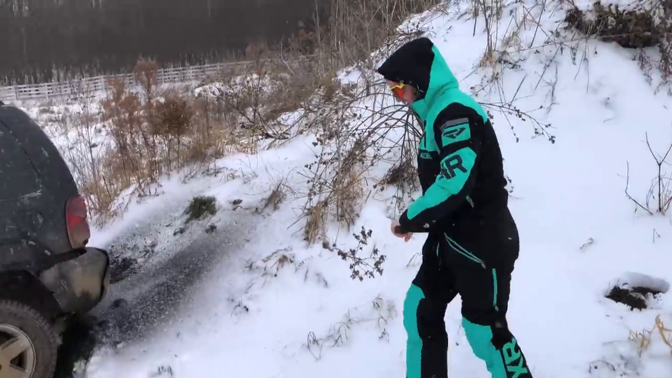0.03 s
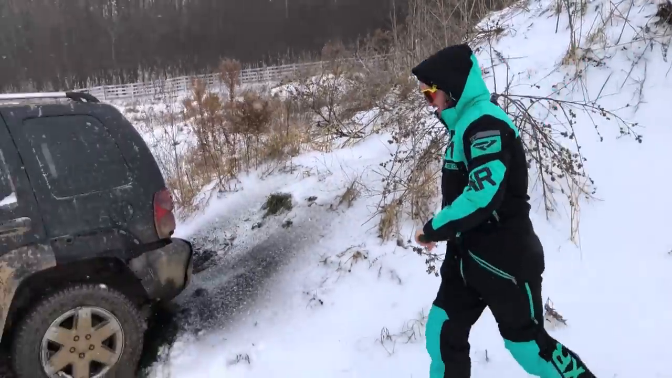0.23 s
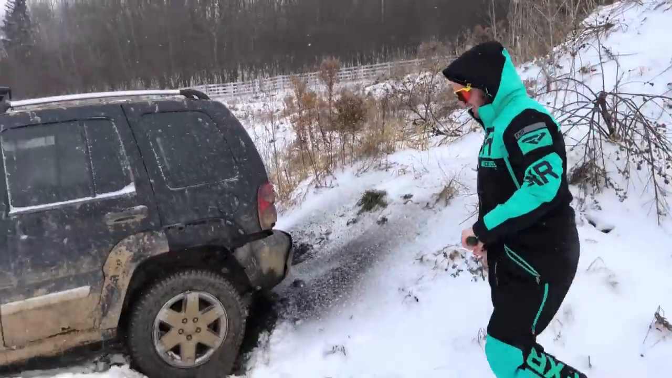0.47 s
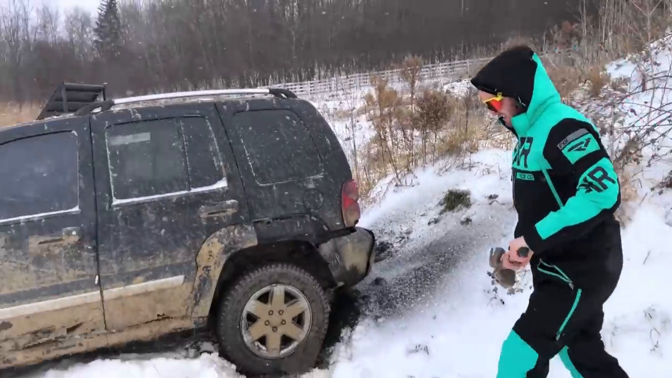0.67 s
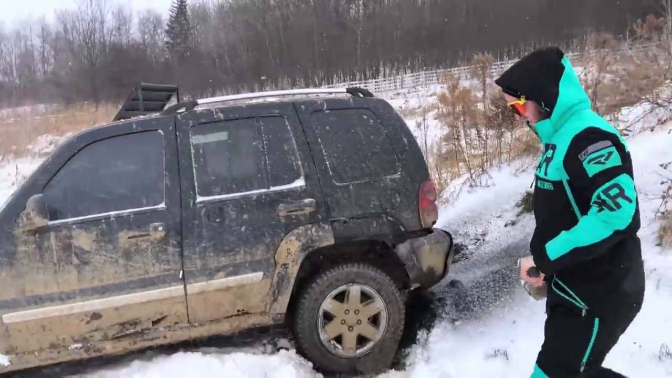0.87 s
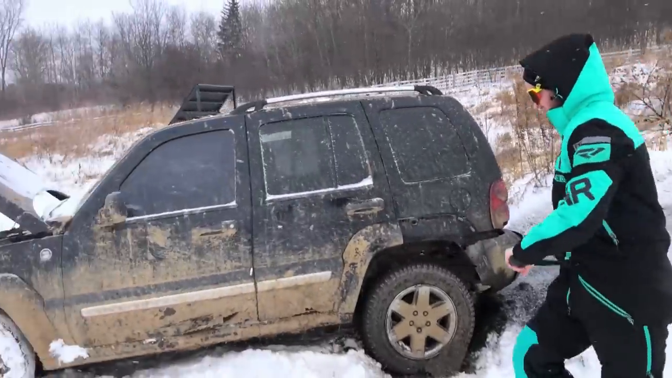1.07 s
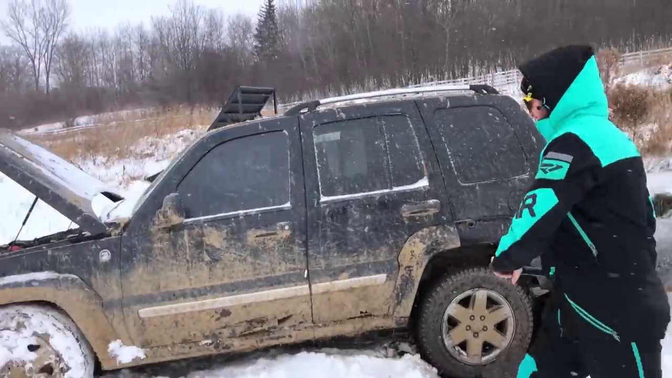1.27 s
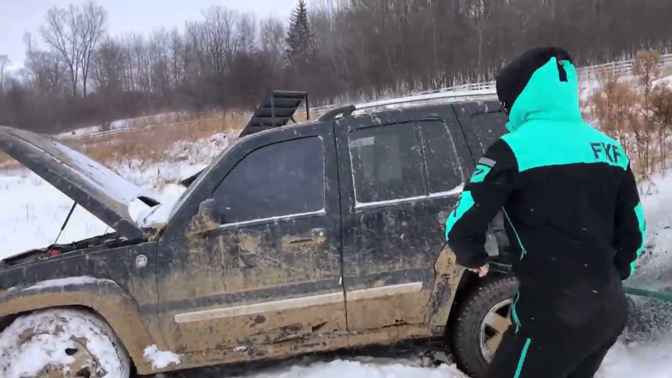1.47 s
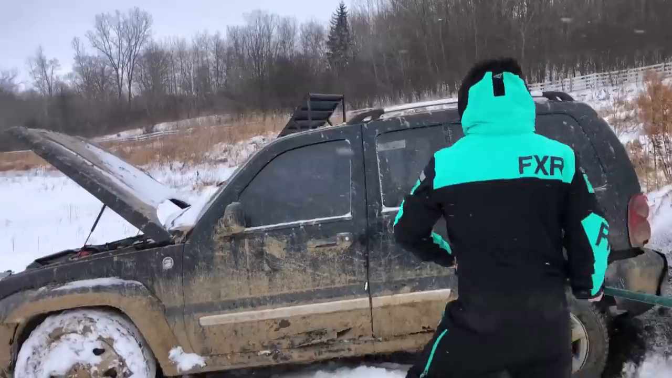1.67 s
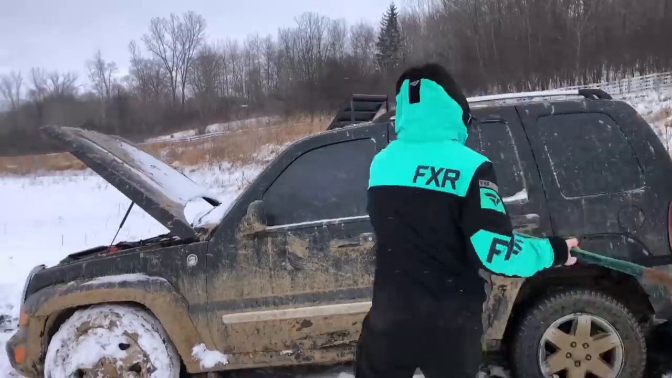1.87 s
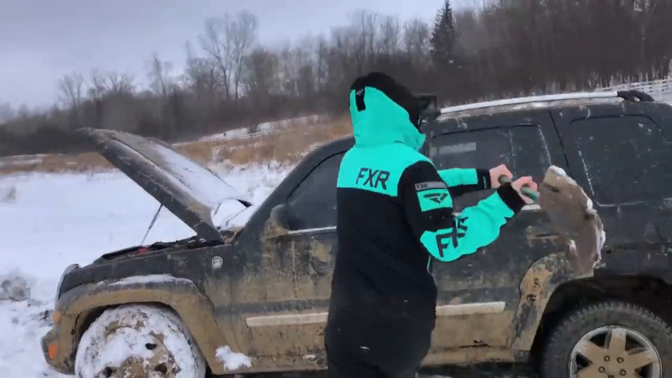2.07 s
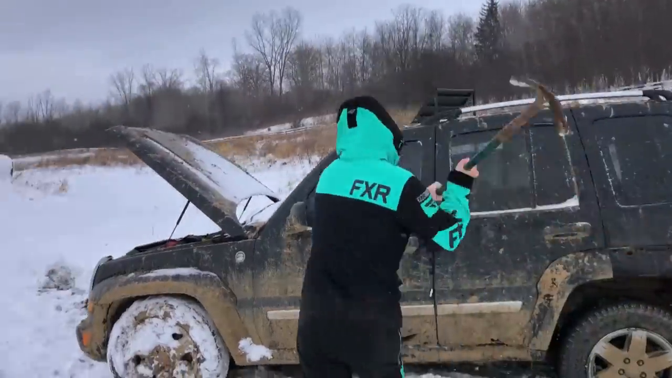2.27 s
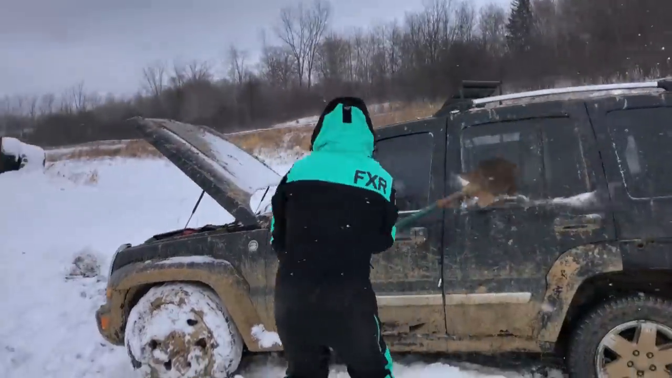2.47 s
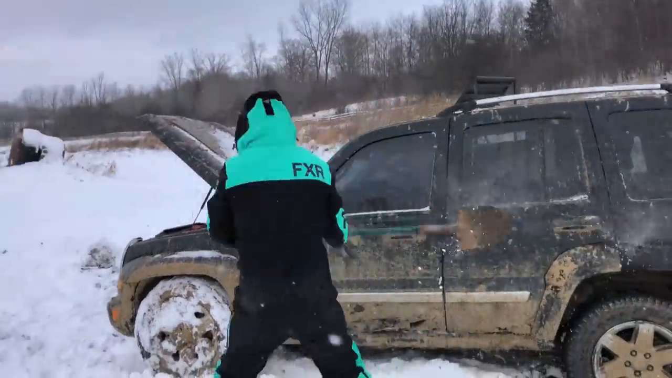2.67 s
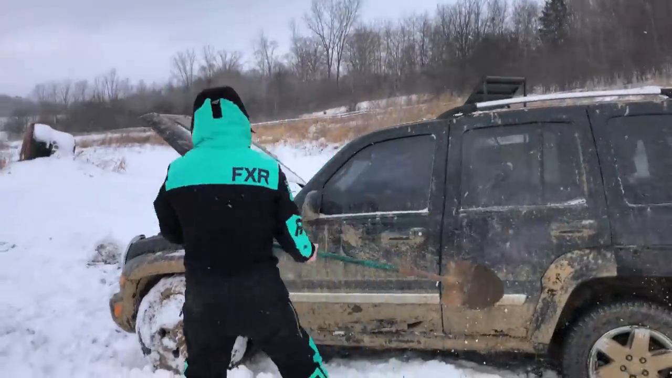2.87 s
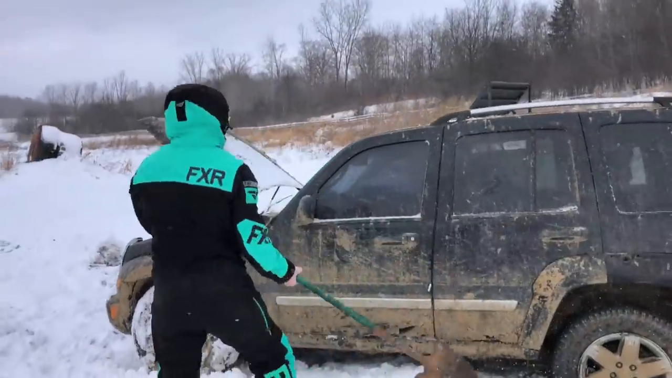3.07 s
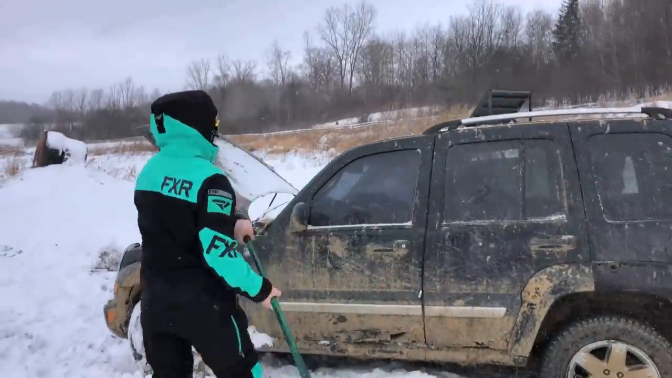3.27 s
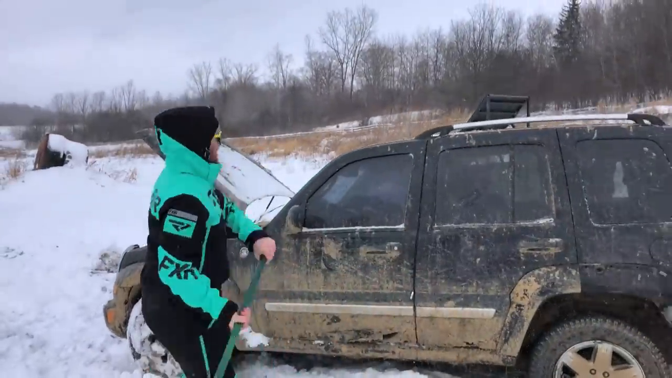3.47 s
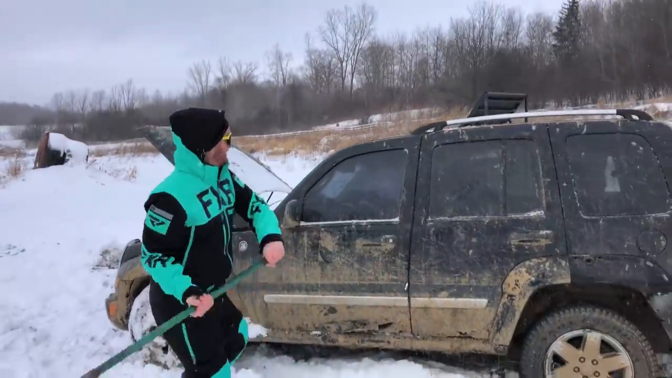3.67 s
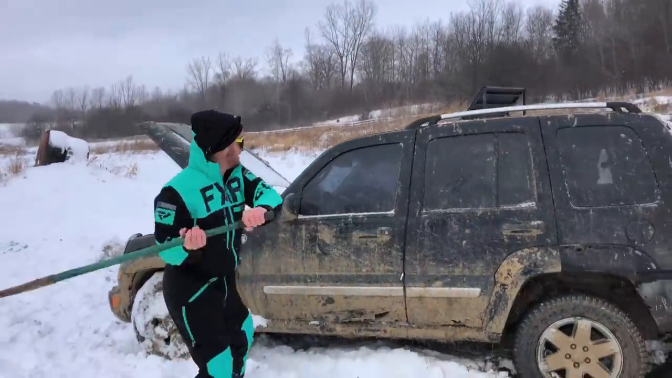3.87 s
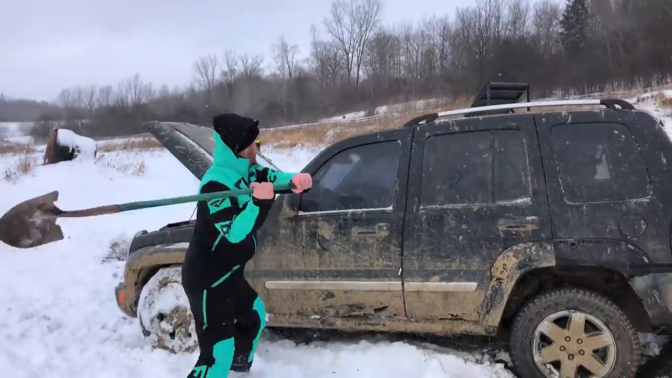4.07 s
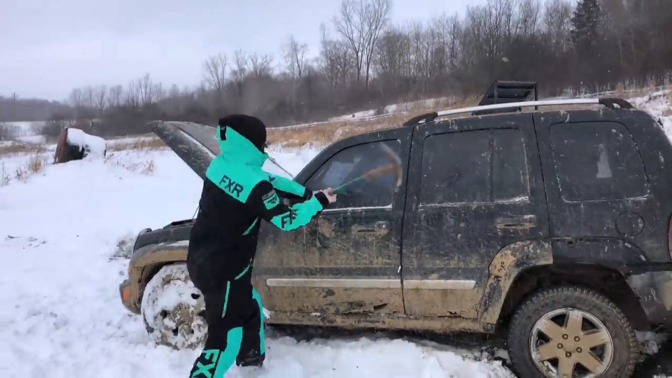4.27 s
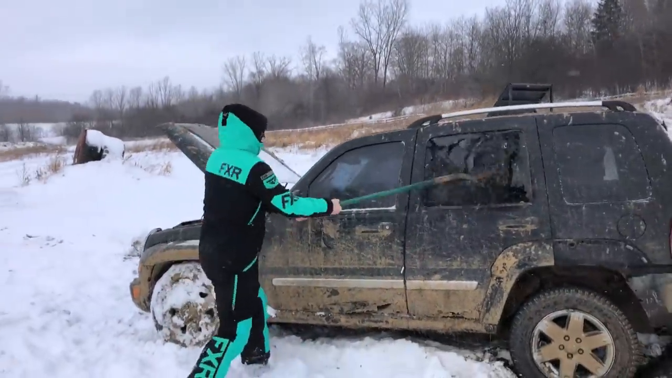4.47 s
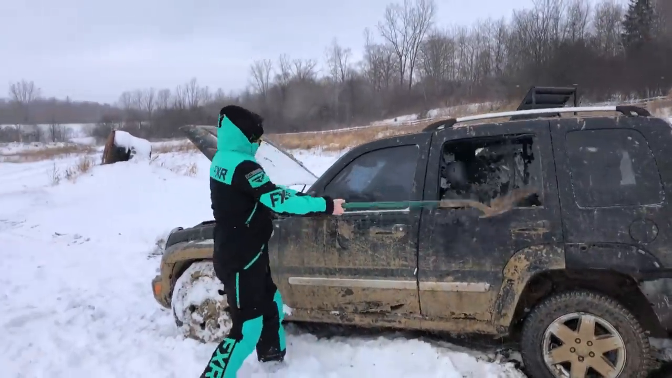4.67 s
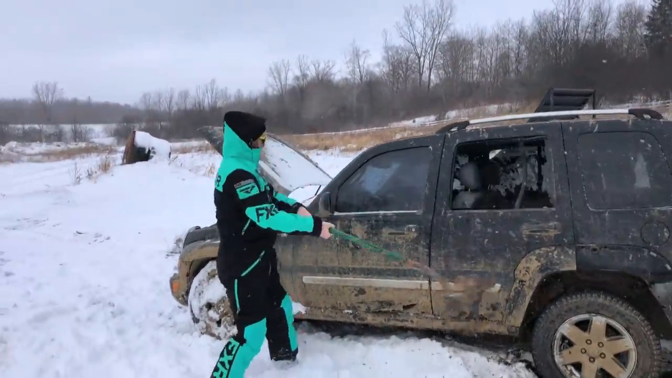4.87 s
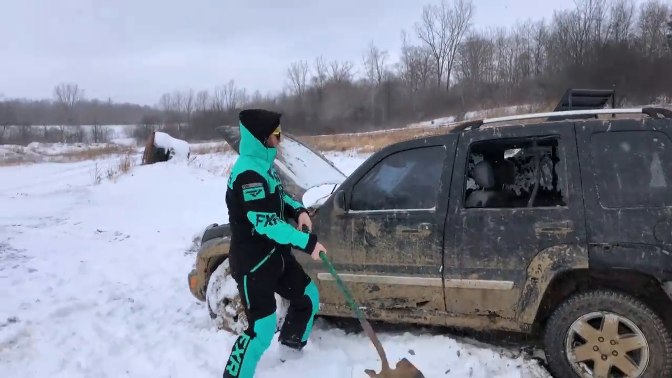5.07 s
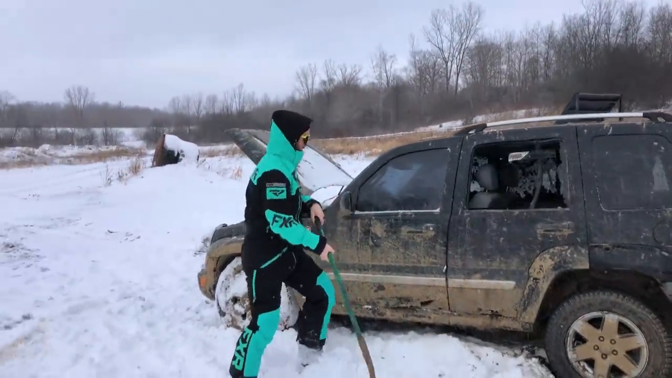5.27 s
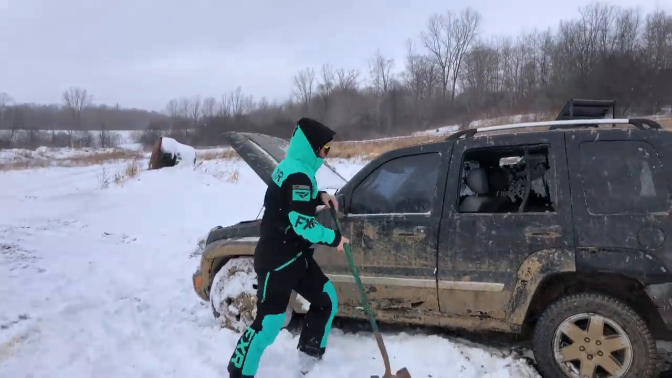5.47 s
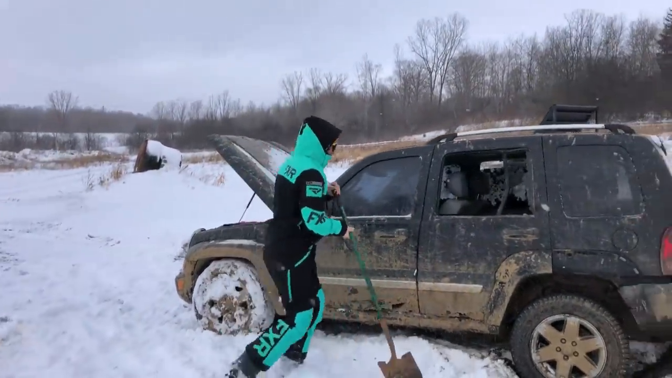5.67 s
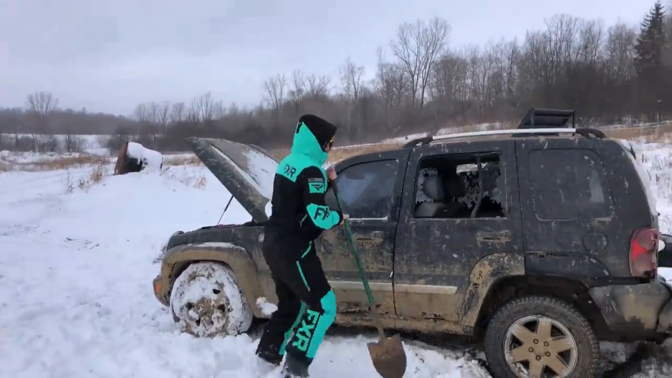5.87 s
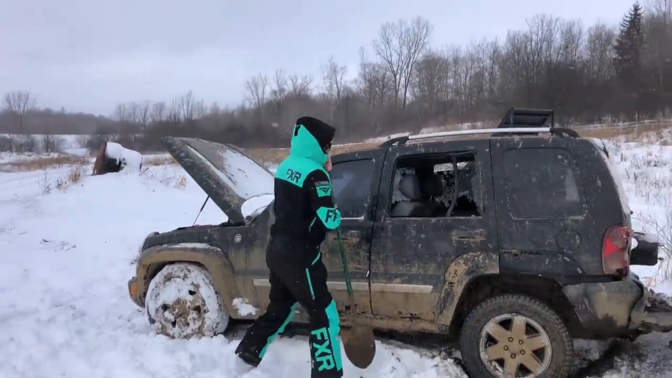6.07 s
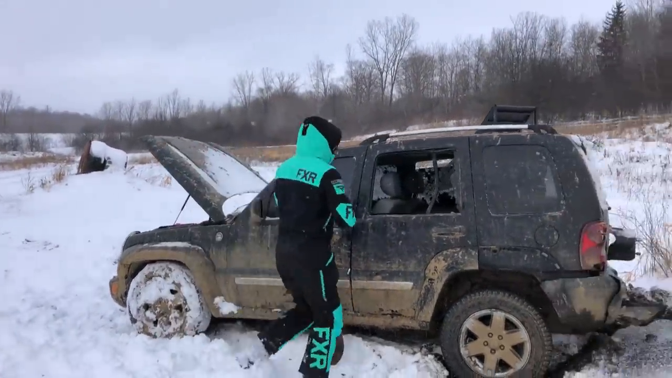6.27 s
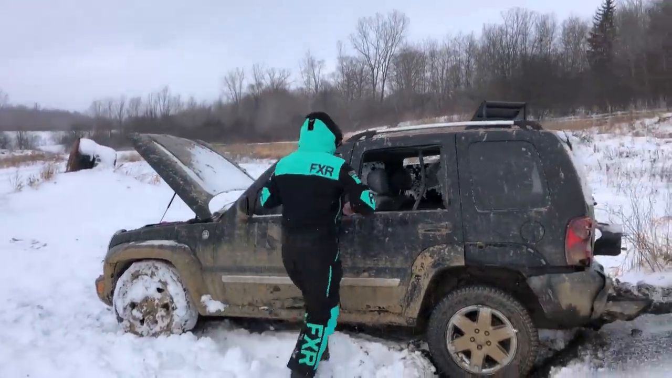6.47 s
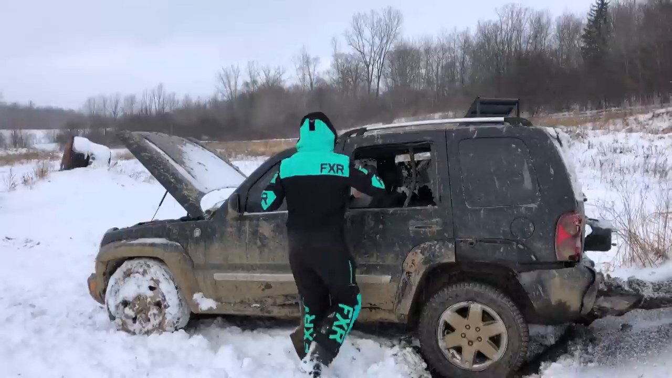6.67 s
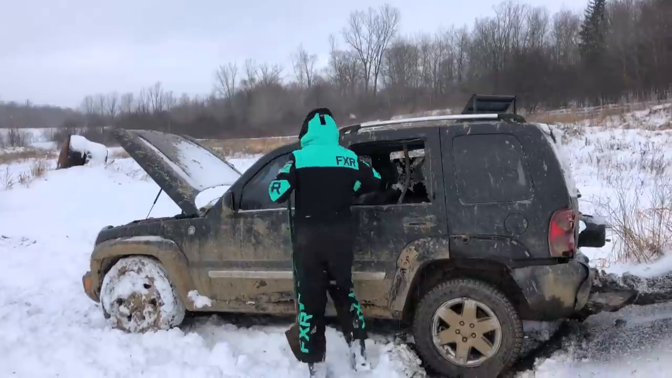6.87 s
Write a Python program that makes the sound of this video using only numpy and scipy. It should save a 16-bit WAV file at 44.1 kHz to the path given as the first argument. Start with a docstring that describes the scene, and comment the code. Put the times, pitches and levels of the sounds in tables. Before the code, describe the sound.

Heavy, gritty snow steps lead to a hard shovel hit on a car window, clattering and thudding through the door. The idle hum briefly sinks, quieter crunches follow, then a brighter crack shatters the toughened glass into a rush of small crumbs with sparse clinks. Close, dry open-air pickup; near the end only soft steps, a dull knock and nylon rustle.

```python
"""A snowy spot beside a car: boots crunch close to the microphone, in runs of small pitched collapses.
A shovel is swung at the side window: struck modes ring in blade and pane, the door thuds and rattles.
The first blow leaves the toughened pane whole; the second bursts it, and thousands of crumb ticks pour
down and thin out, with a few clinking pieces. A dull double knock follows and a snowsuit swishes, all
over an idling engine's hum and ticks, a distant noise wash and a thin whine, which dip after each swing."""
import sys
import numpy as np
from scipy import signal
from scipy.fft import rfft, irfft, next_fast_len
from scipy.io import wavfile
from scipy.ndimage import uniform_filter1d

SR = 44100
rng = np.random.default_rng(int(sys.argv[2]) if len(sys.argv) > 2 else 0)


def write(x):
    x = np.atleast_2d(x).T
    wavfile.write(sys.argv[1], SR, np.round(np.clip(x, -1, 1) * 32767).astype(np.int16))

N = 305172
T = np.arange(N) / SR

# The two swings of the shovel. Each row: landing time in seconds, level of the car body's rattle in dB,
# depth of the background's dip in dB.
SWINGS = [(2.502, -24, 13.5), (4.415, -28.5, 9.5)]
BURST_S = 4.42  # the pane lets go


def undb(db):
    """Decibels to gain."""
    return 10 ** (np.asarray(db) / 20)


def unit(x):
    """Scale to rms 1."""
    return x / np.sqrt(np.mean(x ** 2))


def add(track, s, sound):
    """Mix a short sound in at time s."""
    i = max(int(s * SR), 0)
    track[i:i + len(sound)] += sound[:max(len(track) - i, 0)]


def colour(x, points):
    """Shape a sound by (Hz, dB) points with a causal, minimum-phase filter."""
    size = next_fast_len(len(x) + 2048) // 2 * 2
    hz, db = np.transpose(points)
    f = np.maximum(np.arange(size // 2 + 1) * SR / size, 1)
    cepstrum = irfft(np.log(undb(np.interp(np.log(f), np.log(hz), db))))
    # folding the cepstrum forward in time makes the response causal
    cepstrum[1:size // 2] *= 2
    cepstrum[size // 2 + 1:] = 0
    return irfft(rfft(x, size) * np.exp(rfft(cepstrum)))[:len(x)]


def walk(rate):
    """Slow chance with a spread near 1, redrawn at this rate in Hz and smoothed."""
    k = int(SR / rate)
    steps = np.repeat(rng.standard_normal(N // k + 1), k)
    return unit(uniform_filter1d(steps, k)[:N])


def ring(modes, stretch, pitch=1):
    """Struck modes (Hz, dB, t60 s) dying away, with their lengths stretched and pitches scaled."""
    t = T[:SR // 3]
    return sum(undb(db - 60 * t / (t60 * stretch)) * np.sin(2 * np.pi * hz * pitch * t)
               for hz, db, t60 in modes)


def grain(hz, cycles):
    """One small collapse of snow: a soft-edged wavelet that peaks after the given cycles."""
    turn = T[:int(8 * cycles / hz * SR) + 2] * hz
    rise = turn / cycles
    return (rise * np.exp(1 - rise)) ** 2 * np.sin(2 * np.pi * (turn + rng.random()))


def tread(start, length, db, hz):
    """Snow packs under a sole in a run of small collapses; the faster they come, the higher they sound."""
    crowding, cycles = 1.7, 0.47  # grains per cycle of the tread's pitch, cycles to a grain's peak
    scatter, spread_db = 0.49, 3.5  # chance in grain pitch (natural log) and in grain level
    crunch_fall = 0.39  # the pitch sinks by this natural log over a press as the snow packs
    crunch_top_hz = 935  # packed snow gives no higher grain than this
    press_s, lift_s = 0.0082, 0.01  # the weight comes on and dies away
    t = T[:SR // 2] - .05
    track = np.zeros(len(t))
    slips, chance = rng.random(600), rng.standard_normal((600, 2))
    for k, (slip, (pitch, size)) in enumerate(zip(slips, chance)):
        at = t[0] + (k + slip) / (crowding * hz)
        if at > length + .08:
            break
        sag = np.exp(-crunch_fall * (np.clip(at / length, 0, 1) - .5))
        scattered = np.exp(scatter * np.clip(pitch, -1.6, 1.7))
        f = min(hz * 1.088 * sag * scattered, crunch_top_hz)
        add(track, at - t[0] - cycles / f, undb(spread_db * size) * grain(f, cycles))
    # the weight on the boot sets the power, however it is shared among the grains
    power = np.abs(uniform_filter1d(track ** 2, int(0.039 * SR))) + 1e-4
    weight = np.exp(np.minimum(t, 0) / press_s - np.maximum(t - length, 0) / lift_s)
    out = np.zeros(N)
    add(out, start + t[0], track / np.sqrt(power) * weight * undb(db))
    return out


def boots():
    """Snow packs; its crust holds, then breaks with a thump and gritty edge; the ground rumbles."""
    # Boots pressing the snow. Each row: start in seconds, length in seconds, level in dB before the
    # final colour, nominal crunch pitch in Hz.
    treads = [(0.04, 0.21, -40.5, 200.4), (0.28, 0.069, -36, 169.8), (0.358, 0.13, -30, 292.2),
              (0.534, 0.11, -28, 246.7), (0.72, 0.52, -26, 249.9), (0.881, 0.069, -16, 260.3),
              (0.976, 0.034, -21, 259.4), (1.086, 0.17, -20, 239.1), (1.197, 0.19, -17, 264.7),
              (1.518, 0.022, -32, 218), (1.687, 0.053, -21, 213.1), (1.793, 0.026, -30, 204),
              (2.381, 0.052, -27, 199.5), (2.696, 0.07, -45, 179.3), (2.968, 0.013, -36, 228.6),
              (3.009, 0.018, -34, 290.3), (3.049, 0.059, -41, 208.6), (3.149, 0.016, -40.5, 235),
              (3.215, 0.025, -33, 230.4), (3.255, 0.052, -28.5, 200.1), (3.353, 0.046, -22, 400),
              (3.418, 0.097, -19, 360.3), (3.535, 0.045, -37, 254.1), (3.621, 0.0095, -33.5, 238.1),
              (3.674, 0.062, -30, 203.8), (3.982, 0.054, -30.5, 221.7), (4.055, 0.096, -29, 194.5),
              (4.678, 0.028, -39, 221.5), (4.727, 0.025, -31, 304.7), (4.786, 0.058, -41, 215),
              (5.199, 0.035, -42.5, 210), (6.087, 0.083, -42.5, 201)]
    # The crust giving way. Each row: time in seconds, nominal peak level in dB, pitch in Hz.
    crust = [(0.35, -14, 555), (0.381, -19, 406), (0.414, -16, 466), (0.421, -11, 292), (0.432, -15, 414),
             (0.445, -23, 330), (0.466, -19.5, 450), (0.534, -11.5, 470), (0.551, -11.5, 220),
             (0.562, -14, 328), (0.592, -20, 510), (0.705, -19.5, 473), (0.727, -17, 520),
             (0.763, -15, 675), (0.775, -15.5, 230), (0.793, -17.5, 430), (0.816, -22, 480),
             (0.865, -11.5, 600), (0.880, -12.5, 454), (0.897, -27, 300), (0.922, -12.5, 340),
             (0.934, -5.5, 245), (0.947, -13.5, 483), (0.962, -13.5, 453), (0.997, -18, 380),
             (1.078, -18, 447), (1.09, -10.5, 238), (1.124, -18, 447), (1.163, -14.5, 438),
             (1.190, -5.5, 427), (1.206, -5, 481.6), (1.217, -9, 257), (1.235, -7.5, 463),
             (1.264, -2.5, 217), (1.281, -12, 279.8), (1.302, -10, 306.6), (1.331, -9.5, 524),
             (1.344, -1.5, 566), (1.352, -12, 400), (1.387, -13, 300), (1.687, -14, 370), (1.705, -22, 446),
             (1.733, -13, 300), (2.388, -18, 373), (3.010, -23, 356.2), (3.276, -20.5, 383),
             (3.341, -23, 798), (3.348, -19, 1249), (3.370, -16, 905), (3.384, -15.5, 1109),
             (3.397, -12.5, 560), (3.428, -20, 528.5), (3.442, -12, 520), (3.447, -25, 2580),
             (3.460, -15.5, 510), (3.467, -19, 600), (3.495, -19, 400), (3.506, -20, 904),
             (3.512, -16.5, 345.2), (3.523, -19.5, 330), (3.684, -20, 263), (3.714, -18.5, 300.1),
             (4.015, -20, 380), (4.057, -19.5, 368.6), (4.065, -16, 230), (4.087, -25, 364),
             (4.808, -25, 238), (4.846, -28, 400), (4.737, -28, 420), (6.083, -25.5, 397)]
    # Boots set down without a crunch. Each row: time in seconds, level in dB before the final colour,
    # pitch in Hz.
    thumps = [(0.887, -12, 62.6), (2.843, -37, 220), (3.28, -35, 85), (5.041, -39, 238),
              (5.197, -30, 304.7), (5.216, -29.5, 284), (5.24, -33, 95), (6.115, -36, 260),
              (6.15, -35, 200.4)]
    # Gritty edge of a 400 Hz break. Each row: frequency in Hz, level in dB.
    grit_tone = [(150, -20), (380, 14.5), (600, 11), (900, 1.5), (1500, -10), (2500, -36), (5000, -39)]
    # Ground rumble under the weight. Each row: frequency in Hz, level in dB.
    ground = [(20, -24), (42, -3), (70, 1.5), (100, -10), (160, -15), (400, -60)]
    hold_db = -7  # the packing is this much quieter around each break
    break_cycles, break_db = 0.69, -2.5
    grit_db, grit_db_per_octave = -7, 2  # against a 400 Hz break; harder crust is grittier
    grit_rise = 0.44  # and its grit is brighter: octaves per octave of pitch
    ground_db, ground_power = -29, 0.46  # at a load of 1; the rumble grows as this power of the crunch

    breaks, holding, t = np.zeros(N), np.zeros(N), T[:SR // 40]
    swell = t / .002 * np.exp(1 - t / .002)
    for s, db, hz in crust:
        add(holding, s - .016, np.hanning(len(t)))
        add(breaks, s - break_cycles / hz, undb(db + break_db) * grain(hz, break_cycles))
        hardness = hz / 400
        edge_tone = [(f * hardness ** grit_rise, level) for f, level in grit_tone]
        grit = unit(colour(rng.standard_normal(len(t)), edge_tone))
        add(breaks, s - 0.002, undb(db + grit_db + grit_db_per_octave * np.log2(hardness)) * swell * grit)
    packing = sum(tread(*row) for row in treads) * undb(hold_db * np.minimum(holding, 1))
    for s, db, hz in thumps:
        add(breaks, s - break_cycles / hz, undb(db) * grain(hz, break_cycles))
    load = np.sqrt(np.abs(uniform_filter1d(packing ** 2, SR // 20)))
    rumble = undb(ground_db) * load ** ground_power * unit(colour(rng.standard_normal(N), ground))
    snow_tone = [(30, -4.5), (70, -3.5), (130, 4.5), (600, 2.5), (1500, 1.0), (4000, 2.0), (10000, -30)]
    return rumble + colour(packing + breaks, snow_tone)


def crack():
    """Steel meets glass: a burst with equal energy at every pitch, coloured, and a short splintery tail."""
    # Colour of the crack. Each row: frequency in Hz, level in dB.
    crack_tone = [(300, -8), (1400, 9.5), (3000, 3), (4800, -2.5), (8000, 0), (11000, -8), (16000, -17)]
    burst_db, burst_decay_s, tail_db, tail_s = -2.5, 0.0015, -8, 0.0027
    t = T[:SR // 20]
    rise = 1 - np.exp(-t / 0.00033)
    fade = rise * np.exp(-t / burst_decay_s)
    burst, splinters = rng.standard_normal((2, len(t)))
    # keep only the phases, so that every pitch has the same energy
    burst = unit(irfft(np.exp(1j * np.angle(rfft(burst * fade))), len(t)))
    burst = unit(colour(burst, crack_tone)) * np.sqrt(np.mean(fade ** 2)) * np.exp(-(t / .006) ** 2)
    tail = unit(colour(splinters, crack_tone)) * rise * np.exp(-t / tail_s)
    return undb(burst_db) * burst + undb(tail_db) * tail


def shovel():
    """Each contact cracks, rings blade and pane for a few milliseconds and thuds in the door."""
    # The shovel meeting the car. Each row: time in seconds, nominal ring, crack and door thud levels in
    # dB, ring length factor, pitch factor.
    blows = [(2.4886, -25, -42, -26, 1.2, 0.96), (2.498, -2, -7, -14, 1.34, 1.003),
             (2.508, -14, -20, -23, 1.08, 0.46), (2.5219, -20, -23, -23, 1.03, 0.74),
             (2.5245, -25, -26, -20, 1, 0.6), (2.5375, -27, -30, -22, 0.92, 1.2),
             (2.5447, -10.5, -27, -17.5, 0.63, 0.6), (2.584, -33.5, -33, -29, 1.4, 1.03),
             (4.3933, -22, -26, -57, 0.7, 0.75), (4.4055, -18, -36, -50, 0.7, 0.8),
             (4.4166, -1.5, -3.5, -45, 0.87, 1.06), (4.434, -14, -36, -51, 1.3, 0.51),
             (4.4425, -48, -29, -23, 1.2, 0.5), (4.8711, -19.5, -40, -62, 1.53, 0.56)]
    # Modes of blade against pane. Each row: frequency in Hz, level in dB, t60 in seconds, all nominal.
    pane = [(620, -6, 0.024), (824, -9, 0.014), (1121, 7, 0.011), (1640, 4.5, 0.011), (1920, -5, 0.01),
            (3080, 2, 0.0075), (3480, -5, 0.0088), (5773, -9.5, 0.006)]
    # Modes of the blade once through the pane. Each row: as for the pane.
    blade = [(1049, -2, 0.017), (1400, 2, 0.008), (1630, 5.5, 0.0075), (2280, 0.5, 0.0093),
             (2647, -5.5, 0.012), (3450, 1, 0.006), (4300, -13, 0.012), (6000, -16, 0.0094)]
    # Modes of the door panel. Each row: frequency in Hz, level in dB, t60 in seconds before shortening.
    door = [(47, -22, .15), (82, -13, 0.26), (136, -26, 0.034), (230, 3.5, 0.035), (333, -2, 0.066),
            (480, -2, 0.049), (610, -49, 0.032)]
    pane_gone_s = 4.41
    bite_cycles = 1.0  # each mode builds over this many of its own cycles, so the treble arrives first
    out, t = np.zeros(N), T[:SR // 3]
    for s, ring_db, crack_db, thud_db, stretch, pitch in blows:
        for mode in pane if s < pane_gone_s else blade:
            bite = 1 - np.exp(-t * mode[0] * pitch / bite_cycles)
            add(out, s, undb(ring_db - 2.0) * bite * ring([mode], stretch, pitch))
        add(out, s, undb(crack_db) * crack())
        add(out, s + 0.00235, undb(thud_db) * ring(door, 0.79))  # the heavy panel answers late
    return out


def rattle():
    """Loose trim in the car body shakes for a moment after each swing."""
    # Colour of the car body. Each row: frequency in Hz, level in dB.
    body = [(25, -50), (55, 13.5), (145, 8.5), (500, -1.5), (1500, -11.5), (3000, -17.5), (8000, -33),
            (15000, -40)]
    hold_s, decay_s = 0.038, 0.038
    shake = sum(undb(db) * (T > s) * np.exp(-np.maximum(T - s - hold_s, 0) / decay_s)
                for s, db, _ in SWINGS)
    return shake * unit(colour(rng.standard_normal(N), body))


def glass_flow():
    """How much glass is falling: one rush, then spills off the frame that each swell and thin out."""
    # The rush and the spills. Each row: middle in seconds, half length in seconds, level in dB.
    spills = [(4.448, 0.046, -31.5), (4.526, 0.053, -25.5), (4.615, 0.05, -42), (4.794, 0.15, -36.5),
              (5.045, 0.13, -40), (5.153, 0.048, -46), (5.261, 0.025, -45.5), (5.348, 0.12, -44.5),
              (5.5, 0.035, -50), (5.633, 0.14, -54)]
    return (T > BURST_S) * sum(undb(db) * np.exp(-((T - s) / length) ** 2) for s, length, db in spills)


def glass():
    """Crumbs tick against each other and the door, ever more sparsely; a few larger pieces clink."""
    # Colour of falling glass. Each row: frequency in Hz, level in dB.
    glass_tone = [(590, -3), (1000, -0.5), (1340, -2.5), (3010, -0.5), (3300, -2.5), (3840, -2.5),
                  (4170, -1), (7880, -3), (14100, -11.5), (16000, -23)]
    # Ringing of the crumbs and of what they land on. Each row: frequency in Hz, level in dB,
    # t60 in seconds before a slight shortening.
    shards = [(3030, 3, 0.083), (3830, 4, 0.1), (4600, 3, .1), (4820, 2, .1), (5370, 5, 0.1),
              (7200, -11, 0.1), (7800, -4, 0.1), (8980, 1, .12)]
    # Larger pieces landing. Each row: time in seconds, clink level in dB, pitch in Hz, tick level in dB.
    pieces = [(4.4698, -31, 3480, -23), (4.650, -39, 3120, -35), (4.7116, -39, 990, -42),
              (4.8368, -38, 3416, -32), (4.92, -40, 3050, -39), (4.97, -33, 3130, -48),
              (5.0154, -32, 2110, -46), (5.026, -46, 4200, -37), (5.102, -33, 586, -44),
              (5.121, -29.5, 900, -41), (5.128, -33, 1240, -44), (5.158, -46, 5300, -42),
              (5.176, -48, 4000, -41), (5.243, -47, 1150, -41), (5.254, -44, 3144, -41),
              (5.3014, -39, 1750, -38), (5.389, -37, 2760, -46), (5.4405, -29.5, 2070, -39),
              (5.464, -48, 4800, -43), (5.491, -42, 1560, -43), (5.504, -48, 3900, -42),
              (5.525, -39, 1330, -36.5), (5.5812, -37, 960, -40), (5.625, -54, 5400, -52)]
    # Modes of a piece, scaled so that the first takes its pitch. Each row: frequency in Hz, level in dB,
    # t60 in seconds before a slight shortening.
    piece_modes = [(980, -3.5, 0.047), (1630, -10, 0.027), (2400, -8.5, 0.025)]
    spread_db, clump_db = 1.5, 0.46  # chance in the size of the ticks and in the flow
    ping_db, spray_db = 4, -5
    ping_decay_s, ping_low_hz, ping_octaves = 0.0065, 2697, 1.9  # range of the crumbs' own pitches
    crumb_db, crumb_spread_db, crumb_decay_s = 12.5, 14, 0.00085  # single crumbs that hit the door
    piece_tick_s = 0.0036

    rate = 5000 * np.exp(-np.clip(T - BURST_S, 0, 1.2) / .7)  # ticks per second
    size = undb(spread_db * np.minimum(rng.exponential(size=N), 4))
    # dividing by the root of the rate keeps the power even as the ticks thin out
    ticks = (rng.random(N) < rate / SR) * size * rng.choice([-1, 1], N) / np.sqrt(rate)
    t = T[:SR // 20]
    scrape = np.exp(-t / .002)
    scrape_power = signal.fftconvolve(ticks ** 2, scrape)[:N].clip(0)
    chatter = unit(rng.standard_normal(N) * np.sqrt(scrape_power))
    tinkle = unit(signal.fftconvolve(ticks, ring(shards, 0.99))[:N])
    # single crumbs ping, each at its own pitch
    pings, fade = np.zeros(N), np.exp(-t / ping_decay_s)
    for when, pitch, strength in rng.random((600, 3)):
        hz = ping_low_hz * 2 ** (ping_octaves * pitch)
        add(pings, BURST_S + when * 1.4, strength ** 4 * fade * np.sin(2 * np.pi * hz * t))
    # and single crumbs hit the door, each with a dry tick of its own colour
    hits = np.zeros(N)
    for when, pitch, strength in rng.random((260, 3)):
        hz = 3000 * 3 ** pitch
        tick = unit(colour(rng.standard_normal(len(t)), [(hz / 4, -20), (hz, 0), (hz * 2, -10)]))
        tick = tick * np.exp(-t / crumb_decay_s)
        add(hits, BURST_S + when * 1.4, undb(crumb_db - crumb_spread_db * strength) * tick)
    stream = unit(colour(0.5 * unit(ticks) + chatter, glass_tone))
    stream = stream + undb(-12.0) * tinkle + undb(ping_db) * pings + hits
    flow = glass_flow() * undb(clump_db * walk(30))
    # the heavier the flow, the more fine splinters spray off it
    splinter_tone = [(3000, -24), (6000, 0), (9000, 4), (12500, -1), (16000, -22)]
    splinters = unit(colour(rng.standard_normal(N), splinter_tone))
    spray = undb(spray_db) * np.sqrt(flow / flow.max()) * splinters
    out = flow * (undb(-2.5) * stream + spray)
    for s, clink_db, hz, tick_db in pieces:
        add(out, s, undb(clink_db) * ring(piece_modes, 0.96, hz / piece_modes[0][0]))
        tick = unit(colour(rng.standard_normal(len(t)), glass_tone)) * np.exp(-t / piece_tick_s)
        add(out, s, undb(tick_db) * tick)
    return out


def knock():
    """A short, dull double knock beside the car, made of low struck modes."""
    # The two knocks. Each row: time in seconds, level in dB.
    knocks = [(6.413, -27), (6.42, -20)]
    # Modes of a knock. Each row: frequency in Hz, level in dB, t60 in seconds before shortening.
    knock_modes = [(144, -30, 0.064), (258, -0.5, 0.03), (397, -5, 0.043), (480, 2.5, 0.041),
                   (650, -10, 0.055), (910, -25, 0.033)]
    out = np.zeros(N)
    for s, db in knocks:
        add(out, s, undb(db) * ring(knock_modes, 0.77))
    return out


def snowsuit():
    """Nylon rubs on nylon as arms and legs swing: swelling, flickering noise."""
    # Swishes of the suit. Each row: middle in seconds, half length in seconds, level in dB.
    swishes = [(0.577, 0.003, -38.5), (0.626, 0.099, -50.5), (1.472, 0.03, -46), (2.068, 0.02, -36.5),
               (2.414, 0.14, -48), (2.547, 0.013, -37.5), (3.08, 0.013, -51.5), (3.93, 0.063, -59),
               (6.298, 0.0047, -50), (6.66, 0.019, -54), (6.705, 0.092, -49.5)]
    # Colour of nylon. Each row: frequency in Hz, level in dB.
    nylon = [(1200, -1), (3000, 8.5), (6000, 2.5), (10000, 0), (15000, -10)]
    rub = sum(undb(db) * np.exp(-((T - s) / length) ** 2) for s, length, db in swishes)
    return rub * undb(1.7 * walk(180)) * unit(colour(rng.standard_normal(N), nylon))


def dip_db():
    """The background sinks after each swing, stays low and creeps back."""
    lag_s, fall_s, hold_s, recover_s = 0.029, 0.065, 0.51, 0.92  # lag and hold count from the swing
    return sum(depth * np.clip((T - s - lag_s) / fall_s, 0, 1)
               * np.exp(-np.maximum(T - s - hold_s, 0) / recover_s) for s, _, depth in SWINGS)


def background():
    """An idling engine hums and ticks under a broad wash and a thin whine; all dip after each swing."""
    # Colour of the distant wash. Each row: frequency in Hz, level in dB.
    wash_tone = [(20, -52), (40, -11.5), (55, -2), (145, -7), (195, -8.5), (300, -9.5), (490, -7.5),
                 (720, -13.5), (1150, -9.5), (1350, -12), (1650, -11), (2100, -16), (2550, -18.5),
                 (3000, -24), (4100, -29), (4800, -29), (5400, -34.5), (7000, -35.5), (11500, -40.5),
                 (15500, -52)]
    # Level of the wash before dips. Each row: time in seconds, level in dB.
    wash_level = [(0, -42.5), (1.0, -37), (2.3, -34), (4.3, -33), (5.6, -36.5), (6.92, -38.5)]
    # Partials of the engine hum. Each row: mean frequency in Hz, relative level in dB.
    hum_partials = [(62.5, -0.5), (93.5, 0), (137, -8), (156, -8)]
    # Level of the hum before dips. Each row: time in seconds, level in dB.
    hum_level = [(0, -37.5), (.55, -33.5), (.95, -27.5), (1.6, -36.5), (2.4, -37), (3.4, -42), (4.3, -37.5),
                 (5.0, -45.5), (6.1, -40), (6.92, -49)]
    # Colour of the engine's ticking. Each row: frequency in Hz, level in dB.
    tick_tone = [(1000, -23), (2500, 11), (4700, -0.5), (7000, -6.5), (11000, -7.5), (15500, -29)]
    # Thin whine. Each row: mean frequency in Hz, level in dB against the wash.
    whine_partials = [(6008, -32.5), (8590, -31.5)]
    firing_hz, tick_db, tick_sharpness = 31.5, -17, 1.9  # one tick a firing; level against the wash
    hum_dip_share = 0.57  # the hum dips by this share of the wash's dip

    wash = unit(colour(rng.standard_normal(N), wash_tone)) * undb(1.0 * walk(25))
    clock = np.cumsum(1 + 0.00839 * walk(2.2)) / SR  # the engine speed wanders by under one percent
    hum = sum(undb(db + 2.7 * walk(11)) * np.sin(2 * np.pi * hz * clock) for hz, db in hum_partials)
    firing = np.exp(tick_sharpness * np.cos(2 * np.pi * firing_hz * clock)) * undb(3.3 * walk(30))
    ticking = undb(tick_db) * unit(firing * colour(rng.standard_normal(N), tick_tone))
    whine = sum(undb(db + 1.5 * walk(2.3)) * np.sin(2 * np.pi * np.cumsum(hz + 55 * walk(300)) / SR)
                for hz, db in whine_partials)
    dip = dip_db()
    wash_gain = undb(np.interp(T, *np.transpose(wash_level)) - dip)
    hum_gain = undb(np.interp(T, *np.transpose(hum_level)) - hum_dip_share * dip)
    return (wash + ticking + whine) * wash_gain + unit(hum) * hum_gain


def scene():
    """Everything, in one channel."""
    return (boots() + shovel() + rattle() + glass() + knock() + snowsuit() + background())[None]


def record(dry):
    """The microphone sheds the deepest rumble and rounds the loudest peaks; the top is cut."""
    low_cut_hz, top_hz = 32, 15900
    dry = signal.sosfilt(signal.butter(2, low_cut_hz, "high", fs=SR, output="sos"), dry)
    rounded = dry / (1 + (dry / .9) ** 4) ** .25
    return signal.sosfilt(signal.ellip(8, .2, 70, top_hz, fs=SR, output="sos"), rounded)


dry = scene()
out = record(dry)
write(out)
```